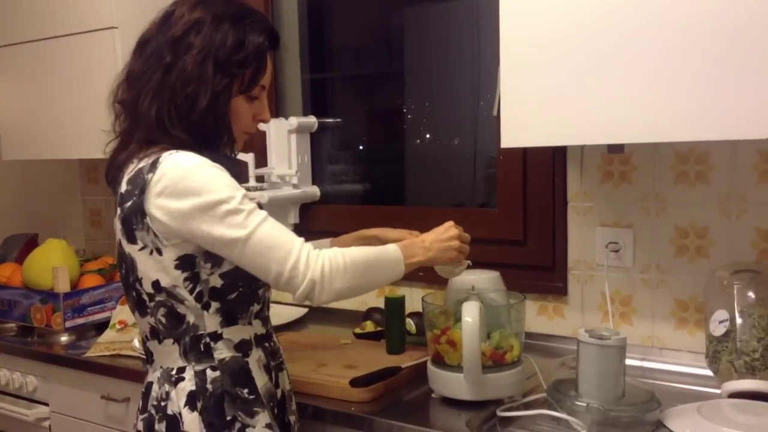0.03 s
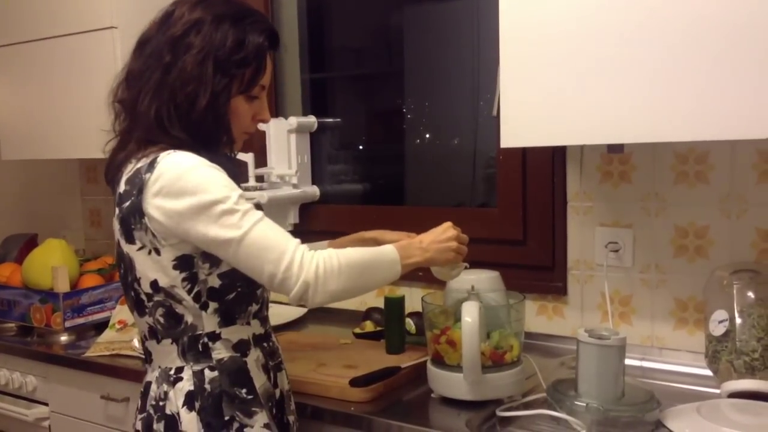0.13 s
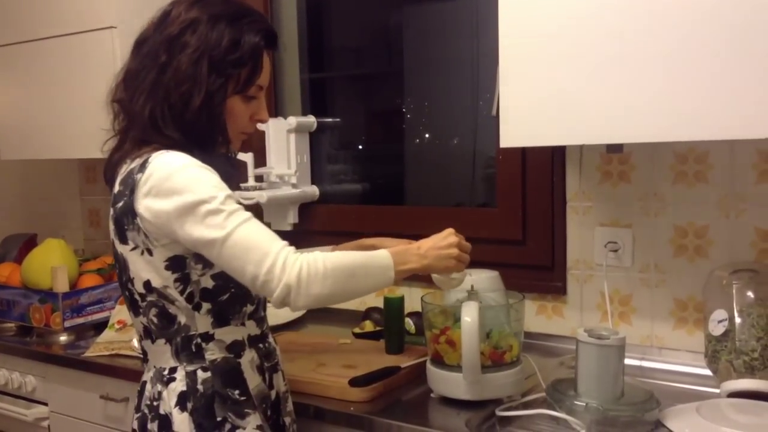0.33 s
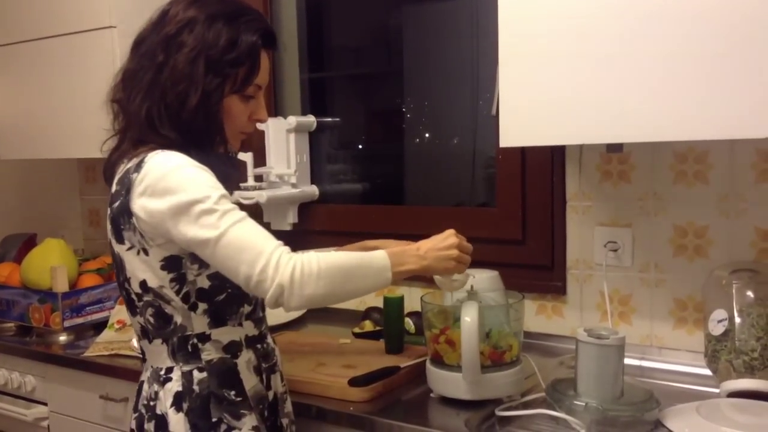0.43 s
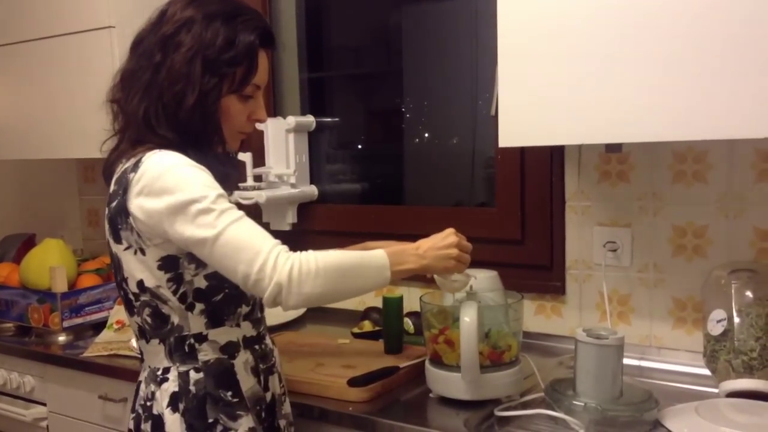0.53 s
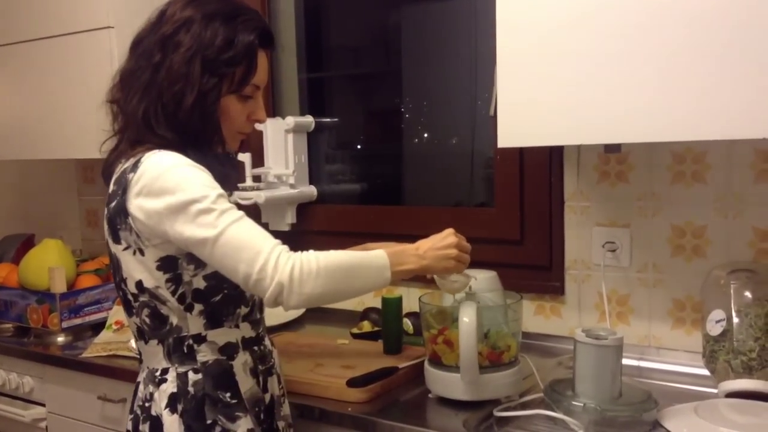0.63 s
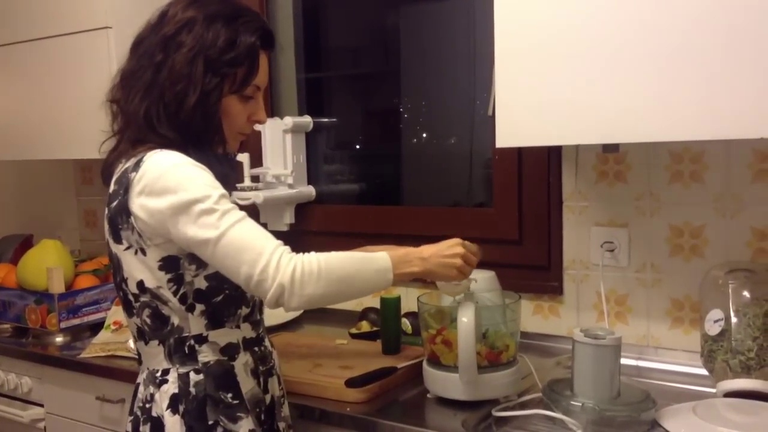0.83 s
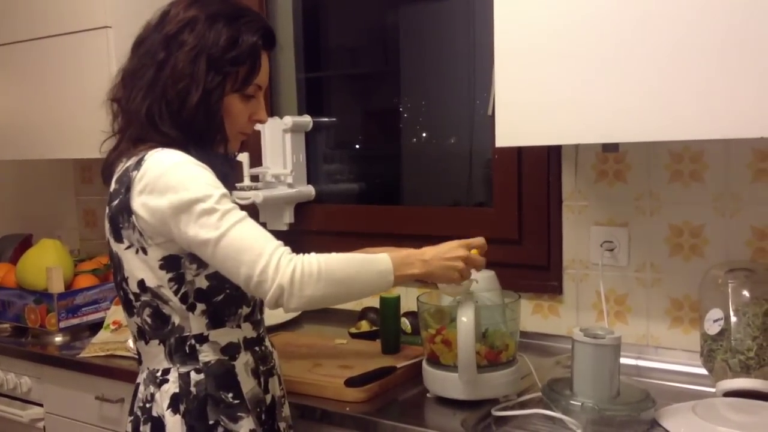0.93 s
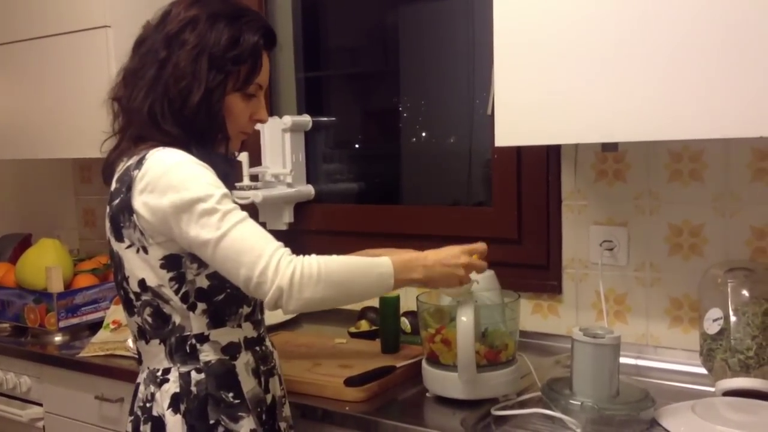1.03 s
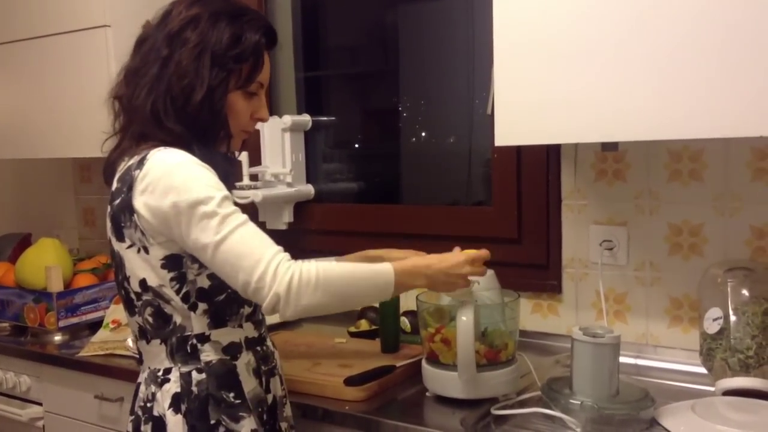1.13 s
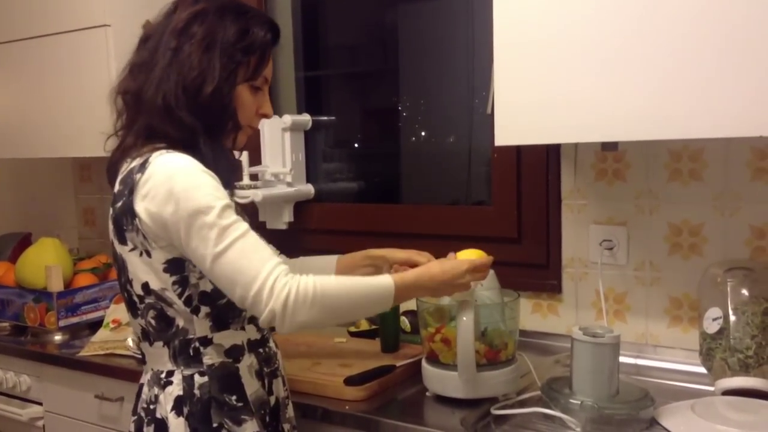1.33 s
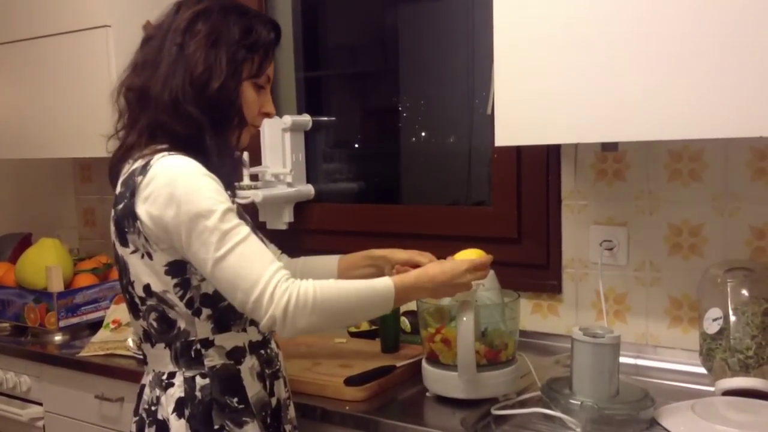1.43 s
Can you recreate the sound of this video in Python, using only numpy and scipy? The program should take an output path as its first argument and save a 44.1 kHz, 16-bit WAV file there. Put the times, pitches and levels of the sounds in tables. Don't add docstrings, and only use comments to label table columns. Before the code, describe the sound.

A lemon half being squeezed over a bowl in a tiled kitchen, heard from a few metres. A faint spit at 0.2 s, then a loud, crisp crack at 0.24 s and bright juicy snaps around 0.31-0.34 s, with a short hard echo and slight bowl ring. A soft thud near 0.5 s, faint spits and wet squelches at 0.83-1.0 s, a low drip at 1.27 s. Steady rumble, hum and hiss.

```python
import sys
import numpy as np
from scipy import signal
from scipy.fft import rfft, irfft
from scipy.io import wavfile
from scipy.ndimage import uniform_filter1d

SR = 44100
rng = np.random.default_rng(int(sys.argv[2]) if len(sys.argv) > 2 else 0)


def waveform_to_disk(signal):
    frames = np.transpose(np.atleast_2d(signal))
    scaled = np.clip(frames, -1, 1) * 32767
    samples = np.round(scaled).astype(np.int16)
    wavfile.write(sys.argv[1], SR, samples)


def nominal_scale(level):
    x = np.asarray(level, float) / 20
    return 10 ** x


N = 66150

SNAP_TIMES = [.191, .2427, .3137, .3255, .3386, .832, .901, .985]
SNAP_LENGTHS = [.004, .00025, .0007, .003, .0005, .002, .0015, .003]
# (rind crack level [dB], juice spit level [dB])
SNAP_LEVELS = [
    (-72, -52.5),
    (-9, -58),
    (-20, -21),
    (-28.5, -51),
    (-26, -19.5),
    (-85, -51),
    (-44, -54),
    (-71, -51.5),
]
# (frequency [Hz], level [dB per Hz])
CRACK_SPECTRUM = [(60, -83), (300, -41.5), (900, -5.5), (1600, -5), (4000, -3.5), (7000, -5.5),
                  (10000, -4.5), (15000, -15.5)]
# (frequency [Hz], level [dB per Hz])
SPIT_SPECTRUM = [(1500, -47), (5000, -3), (8000, -13), (10500, 2), (12500, -5.5), (14300, 3), (16000, -15)]
# (frequency [Hz], level [dB], t60 [s])
BOWL_MODES = [(230, -66, 0.26), (329, -51.5, 0.22), (444, -53.5, 0.16), (633, -54.5, 0.22), (872, -56, 0.1),
              (1086, -55, 0.098), (1246, -49, 0.34)]
SQUELCH_TIMES = [.868, .874, .870, .9405, .983, 1.150]
SQUELCH_LEVELS = [-42, -50, -52, -51, -58, -58]
# (trim [dB], pitch [Hz], length [s])
SQUELCH_SHAPES = [
    (.1, 3990, 0.015),
    (0.097, 1760, 0.01),
    (0.096, 11800, 0.045),
    (.1, 2160, 0.0038),
    (0.088, 4300, .008),
    (0.104, 9900, 0.013),
]
# (time [s], level [dB], pitch [Hz], cycles [count], glide [share of pitch])
DROP_THUDS = [
    (.511, -52, 190, 6, .01),
    (1.269, -46, 420, 1.8, -.4),
    (1.270, -54, 185, 2.6, -.2),
    (.435, -63, 1330, 100, .14),
]
# (frequency [Hz], t60 [s])
ROOM_DECAY = [(250, 1), (800, 0.52), (2000, 0.45), (5500, 0.37), (10000, .28), (15000, 0.21)]
# (frequency [Hz], level [dB per Hz])
HISS_SPECTRUM = [(24, -70), (40, -39), (190, -4), (495, -10), (621, -11.5), (670, -10), (5010, -19),
                 (13400, -15), (16400, -19)]
# (frequency [Hz], level [dB rms], width [Hz])
HUM_LINES = [(145.7, -76.5, 6.6), (203.3, -75.5, 7), (13220, -73.5, 150)]


def evened(x):
    return x / np.sqrt(np.mean(x ** 2) + 1e-20)


def read(points, hz):
    f, value = np.transpose(points)
    return np.interp(np.log(hz + 1), np.log(f + 1), value)


def add(mix, s, sound):
    part = mix[round(s * SR):][:len(sound)]
    part += sound[:len(part)]


def colour(x, points):
    log_gain = np.log(nominal_scale(read(points, abs(np.fft.fftfreq(4096, 1 / SR)))))
    taps = np.fft.ifft(np.exp(log_gain - 1j * signal.hilbert(log_gain).imag)).real[:2048]
    return signal.oaconvolve(x, taps / np.linalg.norm(taps))[:N]


def resonate(x, hz, width):
    turn = np.exp(2j * np.pi * hz * np.arange(len(x)) / SR)
    r = np.exp(-np.pi * width / SR)
    return 2 * (turn * signal.lfilter([1 - r], [1, -r], x / turn)).real


def snaps():
    crack, spit = np.zeros(N), np.zeros(N)
    noise = rng.standard_normal((len(SNAP_LEVELS), 2, 1024))
    for s, length, (crack_db, spit_db), (a, b) in zip(SNAP_TIMES, SNAP_LENGTHS, SNAP_LEVELS, noise):
        add(crack, s, nominal_scale(crack_db) * tear(length, a))
        add(spit, s, nominal_scale(spit_db) * tear(length, b))
    bowl = signal.fftconvolve(crack, bowl_ring())[:N]
    return colour(crack, CRACK_SPECTRUM), colour(spit, SPIT_SPECTRUM), bowl


def tear(length, noise):
    t = np.arange(len(noise)) / SR / length
    burst = noise * t * np.exp(-2 * t)
    for _ in range(4):
        z = rfft(burst)
        flat = irfft(z / uniform_filter1d(abs(z), size=5), len(t))
        burst = flat * (t < 3)
    return burst / abs(burst).max()


def bowl_ring():
    rise_s, longest_s = .006, .22
    t = np.arange(SR // 2) / SR
    ring = np.zeros(len(t))
    for hz, db, t60 in BOWL_MODES:
        ring += nominal_scale(db - 60 * t / min(t60, longest_s)) * np.sin(2 * np.pi * hz * t)
    return ring * (1 - np.exp(-t / rise_s))


def squelches():
    pops_per_s, spread, sharpness = 3500, .08, 3.0
    out = np.zeros(N)
    draws = rng.random((len(SQUELCH_SHAPES), 2, 3000))
    for s, db, (trim_db, hz, length), (u, v) in zip(SQUELCH_TIMES, SQUELCH_LEVELS, SQUELCH_SHAPES, draws):
        t = np.arange(3000) / SR / length
        swell = (2 * t * np.exp(1 - 2 * t)) ** 2
        pops = (u < pops_per_s / SR) * (v - .5)
        width = hz / sharpness
        cavities = np.zeros(len(t))
        for k in (1 - spread, 1 + spread):
            cavities += resonate(resonate(pops, hz * k, width), hz * k, width)
        ring = swell * cavities
        level = nominal_scale(db + np.clip(trim_db, -2, 2))
        add(out, s, level * ring * np.linalg.norm(swell) / np.linalg.norm(ring))
    return out


def thuds():
    out = np.zeros(N)
    for s, db, hz, cycles, glide in DROP_THUDS:
        u = np.arange(0, 1, hz / cycles / SR)
        phase = 2 * np.pi * cycles * (u + glide * (u ** 2 - u))
        add(out, s, nominal_scale(db) * np.sin(np.pi * u) ** 2 * np.sin(phase))
    return out


def kitchen(x):
    early_t60_s, early_db, tail_db = 0.16, 6, 3.5
    taps = np.zeros((2, 30000))
    at = np.arange(18, 29990, 6) + rng.integers(0, 6, (2, 4996))
    np.put_along_axis(taps, at, rng.choice([-1., 1.], at.shape), 1)
    early = taps[0] * nominal_scale(-60 * np.arange(30000) / SR / early_t60_s)
    hz, t, z = signal.stft(taps[1], SR, nperseg=256)
    decay = nominal_scale(-60 * t / read(ROOM_DECAY, hz)[:, None])
    tail = signal.istft(z * decay, SR, nperseg=256)[1][:30000]
    tail[:60] = 0
    room = nominal_scale(early_db) * early / np.linalg.norm(early)
    room = room + nominal_scale(tail_db) * tail / np.linalg.norm(tail)
    return signal.fftconvolve(x, room)[:N]


def background():
    hiss_db, patchy_db = -59, -0.5
    frames, hz = N // 256 + 5, np.fft.rfftfreq(1024, 1 / SR)
    a, b, patches = rng.standard_normal((frames, 513, 3)).T
    patches = uniform_filter1d(patches, size=20, axis=0)
    patches = evened(uniform_filter1d(patches, size=10, axis=1))
    z = (a + 1j * b) * nominal_scale(read(HISS_SPECTRUM, hz)[:, None] + patchy_db * patches)
    out = nominal_scale(hiss_db) * evened(signal.istft(z, nperseg=1024, noverlap=768)[1][:N])
    for f, db, width in HUM_LINES:
        hum = resonate(resonate(rng.standard_normal(N), f, width), f, width)
        out = out + nominal_scale(db) * evened(hum)
    return out


def scene():
    crack, spit, bowl = snaps()
    squelch = squelches()
    direct = nominal_scale(-.7) * crack + nominal_scale(5.0) * spit + squelch + bowl + thuds()
    heard = direct + kitchen(crack + spit + bowl + nominal_scale(-5.5) * squelch)
    low_cut = signal.butter(4, 125, "high", fs=SR, output="sos")
    return (signal.sosfilt(low_cut, heard) + background())[None]


def roll_off(x):
    return signal.sosfilt(signal.butter(12, 16510, fs=SR, output="sos"), x)


def record(dry):
    edge_hz, shelf_db = 15270, -54
    lowpass = signal.firwin(301, edge_hz, window=("kaiser", 7), fs=SR)
    passed = signal.oaconvolve(dry, lowpass[None], "same")
    mix = passed + nominal_scale(shelf_db) * (dry - passed)
    return roll_off(mix)


dry = scene()
out = record(dry)
waveform_to_disk(out)
```